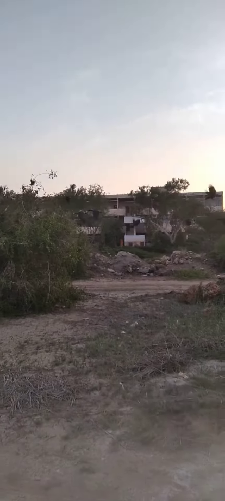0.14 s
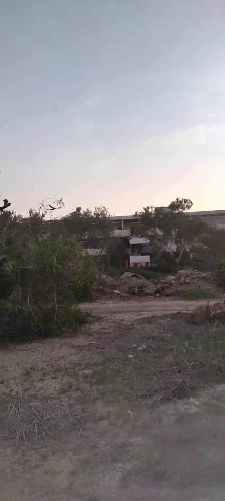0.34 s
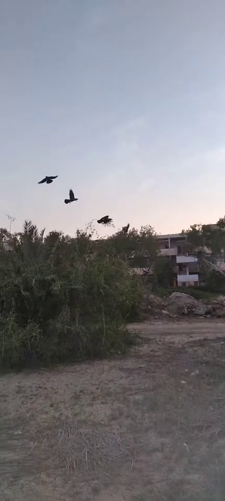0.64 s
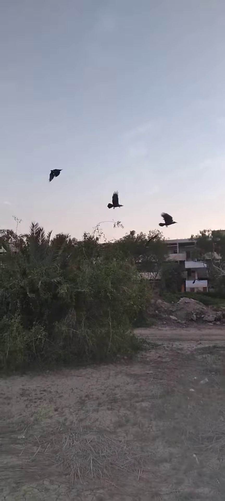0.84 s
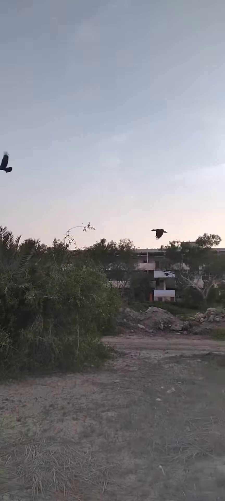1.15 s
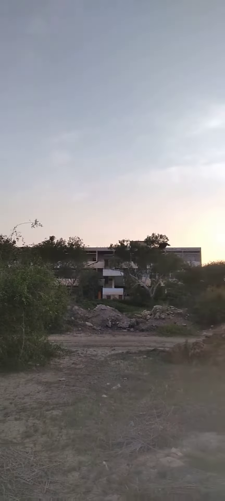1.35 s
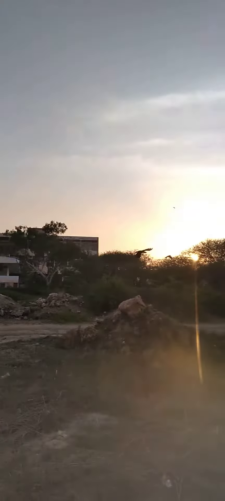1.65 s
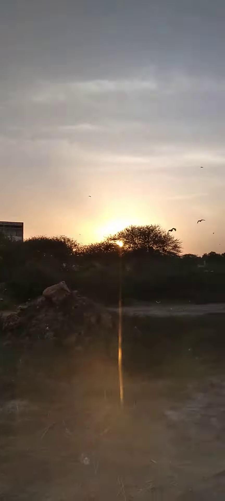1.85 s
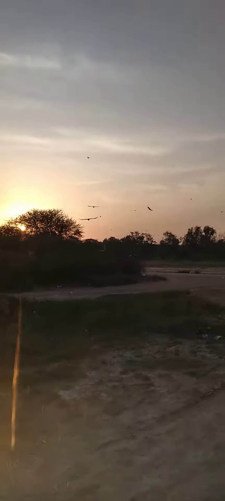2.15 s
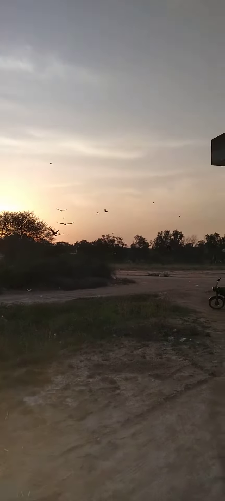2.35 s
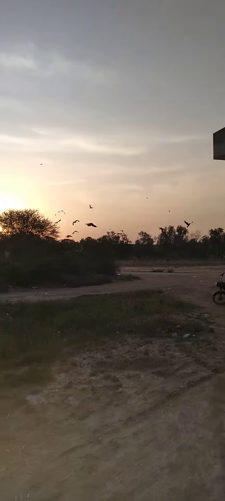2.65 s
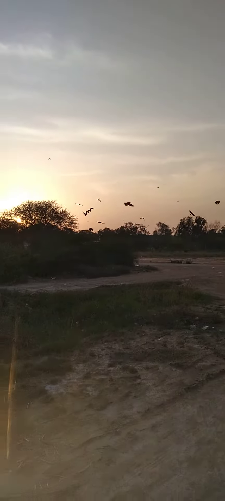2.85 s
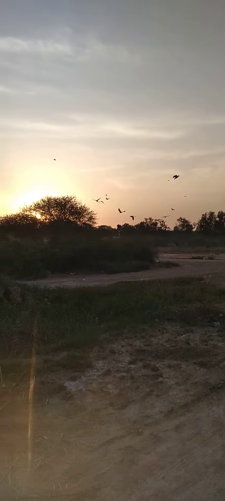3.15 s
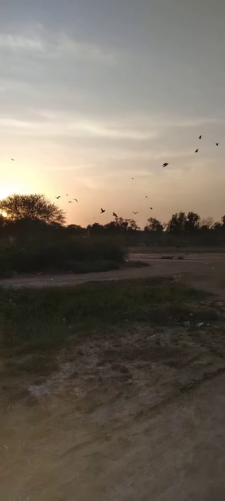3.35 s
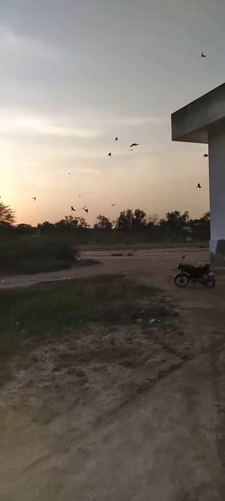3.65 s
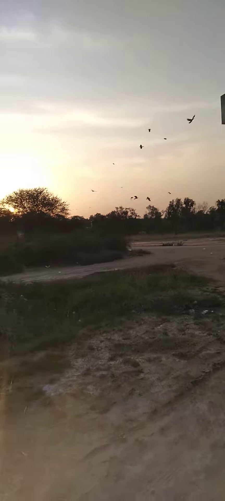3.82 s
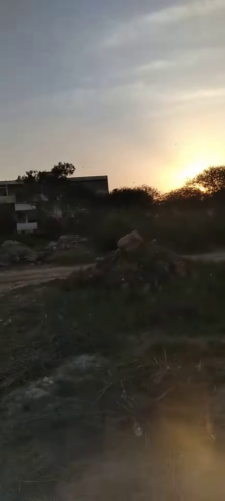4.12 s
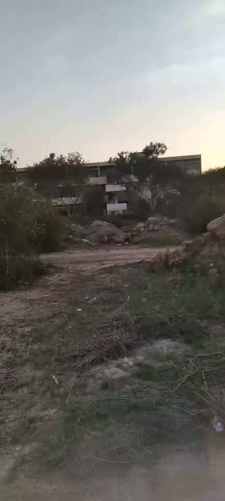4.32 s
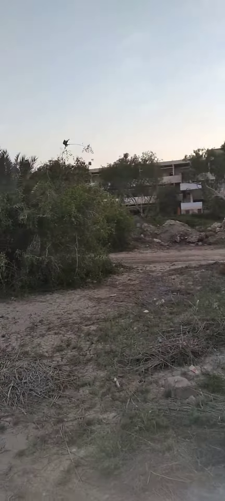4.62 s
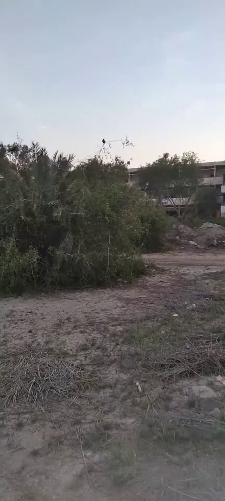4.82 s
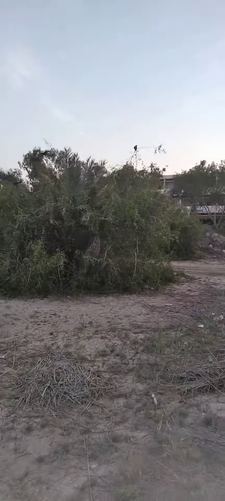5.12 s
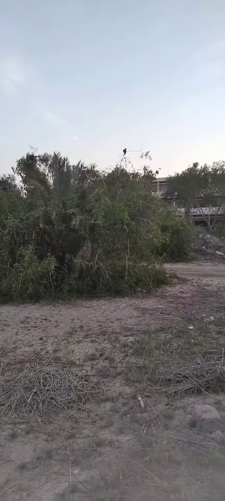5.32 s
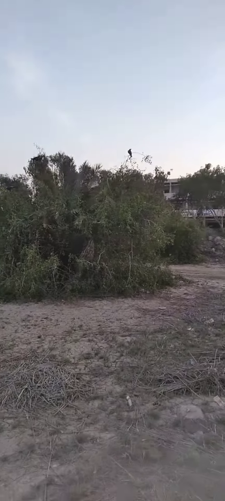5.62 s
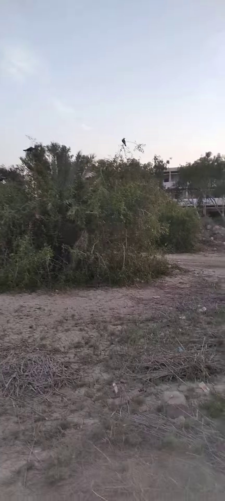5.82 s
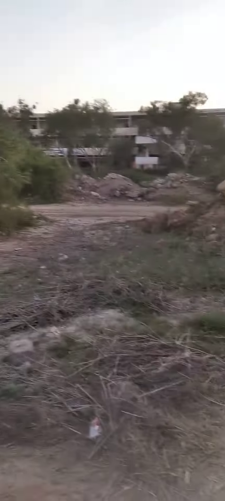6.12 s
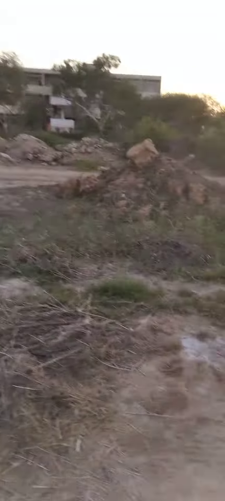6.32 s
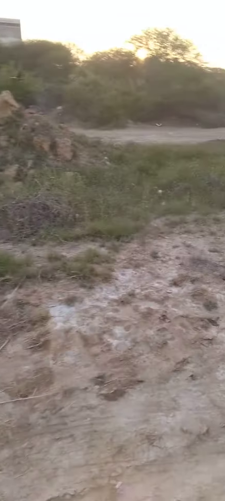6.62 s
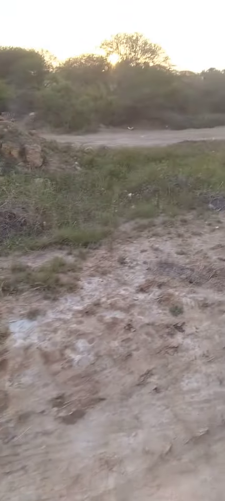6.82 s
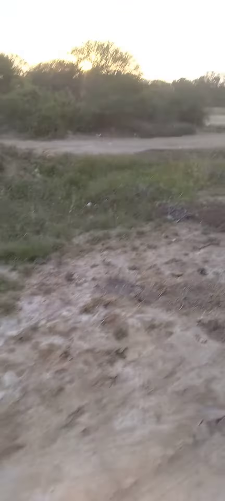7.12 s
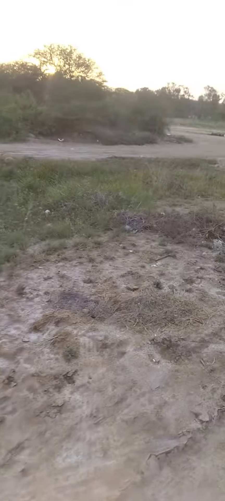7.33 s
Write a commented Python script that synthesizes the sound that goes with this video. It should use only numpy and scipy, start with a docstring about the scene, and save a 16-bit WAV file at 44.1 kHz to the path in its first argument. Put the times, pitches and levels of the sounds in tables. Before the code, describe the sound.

Outdoor crow flock: overlapping hoarse caws give way to sparse calls, with gritty foot scuffs, faint bird chips, and finger plops and clicks close by.

```python
"""Crows caw over open ground at dusk, several at once at first, then singly: warbled harmonics and
puffed turbulence pass through throat and beak. Filtered noise gives the blur of the far flock, a low
rumble and a thin hiss; small birds chip in falling sines. The person holding the microphone shuffles
on gritty soil in bursts of random grains; fingers knock and plop on the left port, as pressure
spikes and sinking, damped tones."""
import sys
import numpy as np
from scipy import signal
from scipy.fft import rfft, irfft, next_fast_len
from scipy.io import wavfile

SR = 44100
rng = np.random.default_rng(int(sys.argv[2]) if len(sys.argv) > 2 else 0)


def transcribe(u):
    """Save the signal u as a 16-bit wav file named by the first command-line argument.

    u: samples, shape (n,) or (channels, n), limited to [-1, 1]; the rate is SR.
    q: integer samples, one column per channel.
    """
    v = np.clip(np.atleast_2d(u).T, -1, 1)
    q = np.round(v * 32767).astype(np.int16)
    wavfile.write(sys.argv[1], SR, q)


N = 329409
TIME = np.arange(N) / SR
# stereo differences are split evenly between the ports, left first
LEFT_MORE = np.array([[.5], [-.5]])
RIGHT_MORE = -LEFT_MORE


def from_db(db):
    """Amplitude ratio: 20 dB is a factor of ten."""
    return 10 ** (np.asarray(db) / 20)


def rms_one(x):
    """Normalisation of mean power: scale to unit rms."""
    return x / np.sqrt(np.mean(x ** 2) + 1e-20)


def in_time(rows):
    """Linear interpolation of (time, value) rows at every sample."""
    return np.interp(TIME, *np.transpose(rows))


def at_hz(points, hz):
    """Interpolation of a spectrum along a logarithmic frequency axis."""
    knots, values = np.transpose(points)
    return np.interp(np.log(hz + 1e-3), np.log(knots), values)


def colour(x, gain_at):
    """Linear filtering as multiplication in the spectrum; gain_at maps frequency to gain."""
    size = next_fast_len(x.shape[-1] + 1024)
    hz = np.arange(size // 2 + 1) * SR / size
    return irfft(rfft(x, size) * gain_at(hz), size)[..., :x.shape[-1]]


def butter(x, hz, kind, order=2):
    """Causal Butterworth filtering: a maximally flat passband."""
    return signal.sosfilt(signal.butter(order, hz, kind, fs=SR, output="sos"), x + 1e-18)


def wander(t, per_s):
    """Slow random modulation: unit-variance random knots joined by straight lines."""
    knots = rng.standard_normal(4096)
    return np.interp(t * per_s, np.arange(len(knots)), knots)


def add(track, s, sound):
    """Superposition: mix a sound in at time s, trimming what lies outside the track."""
    at = round(s * SR)
    sound = sound[..., max(-at, 0):N - at]
    start = max(at, 0)
    track[..., start:start + sound.shape[-1]] += sound


def field(x, dull_hz=4000, t60_s=.6):
    """Diffuse scattering off ground, bushes and walls: decaying noise, independent at each port."""
    t = np.arange(int(.8 * SR)) / SR
    decay = from_db(-60 * t / t60_s)
    early = 1 + 3 * np.exp(-t / .015)
    scatter = rng.standard_normal((2, len(t))) * decay * early * (t > .002)
    scatter = scatter / np.sqrt(np.sum(scatter ** 2, axis=1, keepdims=True))
    # the right port's sound excites the tails at both ports
    wet = from_db([[-7], [-10]]) * signal.fftconvolve(x[1:], scatter, axes=1)[:, :N]
    return butter(wet, dull_hz, "low", order=1)


# Resonances of a crow's throat: (f/Hz, level/dB)
THROAT = [(300, -21), (480, -22), (860, -7), (1100, -8.5), (1350, -1), (1540, -3), (1850, 0), (2280, 0.5),
          (2750, -14.5), (3400, -12.5), (3800, -12), (4080, -4.5), (4500, -18.5), (5400, -18.5),
          (7000, -22.5), (9700, -26.5), (12500, -51)]


def throat(hz, beak_hz, rasp_db, beak_db=12.5, width_hz=170):
    """Source-filter principle: gain of throat and open beak; rasp raises the treble."""
    beak = beak_db / (1 + ((hz - beak_hz) / width_hz) ** 2)
    rasp = rasp_db / (1 + (3000 / (hz + 1)) ** 4)
    return from_db(at_hz(THROAT, hz) + beak + rasp)


# the rattle shakes the strength; turbulence grows with roughness; a call swells towards its middle
THROB_DB, TURBULENCE, ROUGH_TURBULENCE, SWELL_DB = 2.5, 0.16, 3.4, 23
# exponent by which the harmonics' resonances sink with the pitch
BEAK_FOLLOWS = 0.66


def caw(length, start_hz, top_hz, end_hz, rattle_hz, warble, beak_hz, rough, rasp_db):
    """Modulated source and filter: an arch of pitch, shaken by a slower vibration of the syrinx."""
    t = np.arange(int(length * SR)) / SR
    u = t / length
    # a call that starts near its top pitch peaks early, in pitch and in strength
    rise = np.sqrt(abs(top_hz - start_hz) + 1)
    fall = np.sqrt(abs(top_hz - end_hz) + 1)
    crest = rise / (rise + fall)
    before = np.maximum(1 - u / crest, 0) ** 2
    after = np.maximum((u - crest) / (1 - crest), 0) ** 2
    arch = top_hz + (start_hz - top_hz) * before + (end_hz - top_hz) * after

    # the rattle slows towards the end and bends both pitch and strength
    rattle_rate = rattle_hz * (1.05 - .12 * u + .15 * rough * wander(t, 90))
    rattle = 2 * np.pi * (np.cumsum(rattle_rate) / SR + rng.random())
    jitter = .03 * rough * wander(t, 350) + .004 * wander(t, 30)
    pitch = arch * (1 + warble * np.sin(rattle) + jitter)
    throb = from_db(THROB_DB * np.cos(rattle + .5) + 3.3 * rough * wander(t, 129.5))
    phase = 2 * np.pi * np.cumsum(pitch) / SR

    # the beak closes as the pitch sinks, lowering the resonances that shape the harmonics
    opening = (arch / top_hz) ** BEAK_FOLLOWS
    tone = sum(throat(k * pitch / opening, beak_hz, rasp_db) * np.cos(k * phase)
               for k in range(1, 15))
    # turbulence comes in puffs, one a cycle, with extra treble
    puffs = rng.standard_normal(len(t)) * (1 + .7 * np.cos(phase))
    turbulence = (TURBULENCE + ROUGH_TURBULENCE * rough) * puffs
    turbulence = turbulence + 2.1 * butter(puffs, 5000, "high")
    voice = throb * (tone + colour(turbulence, lambda hz: throat(hz, beak_hz, rasp_db)))

    fade_in = np.sin(np.pi / 2 * np.clip(t / 0.024, 0, 1))
    fade_out = np.sin(np.pi / 2 * np.clip((length - t) / 0.059, 0, 1))
    swell = from_db(-SWELL_DB * (u - (crest + .5) / 2) ** 2)
    return rms_one(voice) * fade_in * fade_out * swell


# Near calls: (t/s, voice, length/s, top f/Hz, level/dB before swell and stereo split,
# roughness/0-1, rasp/dB)
CAWS = [ (-.15, "flat", 0.23, 461.3, -31.5, 0.28, -5), (.019, "hoarse", .44, 477.2, -32, 0.56, -8.5),
        (0.171, "shrill", .21, 527.7, -36.5, .77, 4), (.332, "flat", 0.39, 451.3, -35, 0.68, -9),
        (.53, "shrill", 0.29, 497.8, -36.5, 0.55, -8), (.668, "hoarse", 0.4, 457, -30, 0.59, -8),
        (.718, "curt", 0.23, 470.7, -31.5, 0.8, -15), (1.026, "flat", 0.21, 455, -43, 0.53, -11),
        (1.252, "deep", 0.29, 417.4, -34.5, 0.47, -2), (1.289, "gruff", 0.35, 472.3, -30.5, 0.34, -10.5),
        (1.656, "curt", 0.19, 491.4, -39, 0.28, -5), (1.715, "deep", .3, 421, -33.5, 0.61, -7),
        (1.839, "gruff", .28, 399.3, -41.5, .4, -8), (2.511, "curt", 0.18, 493.3, -39, .3, -2),
        (2.931, "curt", 0.18, 495.5, -39, .27, 0), (3.357, "curt", .16, 494, -43, .25, -4),
        (3.761, "hoarse", 0.31, 450.4, -38.5, .15, 2.5), (4.004, "flat", 0.16, 450, -46.5, 0.37, -5),
        (4.132, "flat", 0.142, 456.5, -49.5, 0.65, -5), (4.834, "hoarse", 0.3, 456, -35.5, 0.14, -4),
        (5.748, "sagging", .33, 445.4, -40.5, 0.08, -7.5), (5.976, "sagging", 0.052, 464, -37.5, .15, -18),
        (6.478, "falling", .31, 486, -41, 0.23, 1), (6.61, "sagging", 0.28, 452, -37, .13, 3.5)]
# Voices by name: (nominal rattle rate/Hz, warble/share of pitch, beak resonance f/Hz,
# right minus left level/dB before shading, rise/share of top pitch, fall/share of top pitch)
VOICES = { "hoarse": (79, 0.067, 1783, 0.76, .1, .125), "gruff": (71, .053, 1938, 2.5, .09, .18),
          "deep": (63, 0.059, 1830, 1, .09, .11), "shrill": (57, 0.06, 2170, 2.1, 0.0355, 0.12),
          "curt": (66, 0.049, 1933, 2, 0.0452, 0.0644), "falling": (58, 0.05, 2090, 6.3, 0.0032, .12),
          "sagging": (69, .044, 1838, -.5, .055, .15), "flat": (73, 0.055, 1885, 2.4, 0.0402, .065)}
# Shading of the left port, which faces away from the birds: (f/Hz, level/dB)
LEFT_SHADE = [(900, -2.5), (2000, -3), (4000, -4), (7000, -15.5), (11000, -35)]


def crows(lag_ms=0.16):
    """Interaural-type cues: near calls, mostly to the right, reach the left port later and duller."""
    out = np.zeros((2, N))
    for s, voice, length, top_hz, level_db, rough, rasp_db in CAWS:
        rattle_hz, warble, beak_hz, right_db, rise, fall = VOICES[voice]
        start_hz, end_hz = top_hz * (1 - rise), top_hz * (1 - fall)
        call = caw(length, start_hz, top_hz, end_hz, rattle_hz, warble, beak_hz, rough, rasp_db)
        t = np.arange(len(call)) / SR
        late_s = (lag_ms + rng.uniform(-.07, .07)) / 1000
        ports = np.array([np.interp(t - late_s, t, call), call])
        add(out, s, ports * from_db(level_db + right_db * RIGHT_MORE))
    out[0] = colour(out[0], lambda hz: from_db(at_hz(LEFT_SHADE, hz)))
    return out + field(out)


# Correlation of the two ports: (f/Hz, likeness/0-1)
LIKENESS = [(40, 0.38), (150, 0.98), (500, 0.77), (1500, 0), (5000, 0)]


def air(spectrum):
    """Partial coherence: mid and side noise make the ports more alike in the bass; joint rms is 1."""
    def likeness(hz):
        """Coherence at a frequency, kept within its bounds."""
        return np.clip(at_hz(LIKENESS, hz), -1, 1)

    mid, side = rng.standard_normal((2, N))
    mid = colour(mid, lambda hz: from_db(at_hz(spectrum, hz)) * np.sqrt(1 + likeness(hz)))
    side = colour(side, lambda hz: from_db(at_hz(spectrum, hz)) * np.sqrt(1 - likeness(hz)))
    return rms_one(np.array([mid + side, mid - side]))


# Spectral shape of the rumble: (f/Hz, relative level per Hz/dB)
RUMBLE = [(12, 7), (25, 9.5), (40, 0), (60, 4), (90, 2), (140, -1), (220, -9.5), (330, -15.5), (500, -20),
          (750, -21), (1100, -27), (1600, -60)]
# Course of the rumble before gain and drift: (t/s, level/dB)
RUMBLE_DB = [(0.0, -43.5), (5.55, -44.5), (6.05, -41.5), (7.2, -43), (7.47, -44)]


def rumble(gain_db=4.0, left_db=0.5):
    """Band-shaped noise: a low rumble whose level drifts at random, slightly stronger on the left."""
    drift_db = 1.2 * wander(TIME, 16)
    return air(RUMBLE) * from_db(in_time(RUMBLE_DB) + gain_db + drift_db + left_db * LEFT_MORE)


# Spectral shape of the distant flock: (f/Hz, relative level per Hz/dB)
FAR_FLOCK = [(400, -9.5), (900, -4), (1150, -4.5), (1400, -0.5), (1800, 2), (2400, -7.5), (3200, -11.5),
             (4000, -17.5), (5000, -22.5), (7000, -31.5), (9800, -34.5), (12000, -60), (15000, -50)]
# The flock calms after the opening chorus, then partly returns: (t/s, level/dB before dips and flutter)
FAR_DB = [(0, -47.5), (2.1, -52), (4, -56), (7.47, -52)]
# Moments when the distant background is heard more faintly, whatever the birds do:
# (t/s, half width/s, depth/dB)
BACKGROUND_DIPS = [(4.6, 0.034, 9.5), (5.64, 0.06, 5.5), (6.19, 0.046, 8), (6.415, 0.051, 13.5),
                   (7.38, 0.085, 9)]


def far_flock(right_db=3.5):
    """Statistical superposition: many far calls blur into fluttering noise, stronger on the right."""
    flutter_db = .8 * wander(TIME, 22)
    dips_db = sum(depth_db * np.exp(-((TIME - s) / width) ** 2)
                  for s, width, depth_db in BACKGROUND_DIPS)
    return air(FAR_FLOCK) * from_db(in_time(FAR_DB) - dips_db + flutter_db + right_db * RIGHT_MORE)


# Spectral shape of the hiss: (f/Hz, relative level per Hz/dB)
HISS = [(3000, -1), (6000, -1.5), (9700, -1), (12000, -16.5), (15000, -34)]
# Swells of the hiss: (t/s, length/s, peak level on the right/dB)
HISS_SWELLS = [(-.1, 0.58, -55.5), (0.444, 0.72, -59.5), (1.332, 0.31, -53.5), (4.792, 0.36, -58.5),
               (5.634, 0.495, -60), (6.53, .35, -58.5)]


def hiss(left_db=-15):
    """Amplitude-modulated noise: a thin, high hiss swells, mainly on the right."""
    swells = np.zeros(N)
    for s, length, level_db in HISS_SWELLS:
        arch = abs(np.sin(np.pi * np.clip((TIME - s) / length, 0, 1)))
        swells += from_db(level_db) * np.sqrt(arch)
    return air(HISS) * swells * from_db([[left_db], [0]])


# Shoes on grit: (t/s, length/s, level/dB, low crunch/dB)
SCUFFS = [(0.365, 0.07, -43.5, 10), (.955, .08, -37, 0), (2.087, .063, -52.5, 3), (2.291, 0.053, -56.5, 9),
          (2.772, .026, -57, 10), (3.252, .053, -57, -1), (3.927, .051, -37.5, 6.5),
          (3.979, .088, -46.5, 4), (4.658, .013, -43, 18), (4.681, .1, -48.5, 12.5),
          (4.731, 0.0067, -38, 20.5), (5.146, 0.016, -44, 32), (5.402, .018, -50, 18),
          (6.121, 0.027, -52, 14)]
# Spectral shape of the grit: (f/Hz, level/dB)
GRIT = [(150, -12), (400, 5), (720, 6), (1100, -5.5), (1800, 11.5), (2750, 11), (3500, -6), (4700, -0.5),
        (6500, -17), (10000, -21.5), (13000, -45.5)]


def shoes(grains_per_s=900, grain_db=6.0):
    """Random impulse process: uneven grains crack under a turning sole, amid sliding noise."""
    out = np.zeros((2, N))
    for s, length, level_db, low_db in SCUFFS:
        size = int((length + .01) * SR)
        t = np.arange(size) / SR
        # one stream is shared by the ports, the other two are their own
        struck = rng.random((3, size)) < grains_per_s / SR
        strength = from_db(grain_db * np.minimum(rng.exponential(1, (3, size)), 3))
        grains = struck * strength * rng.choice([-1, 1], (3, size))
        sliding = 0.79 * rng.standard_normal((3, size))
        fades = np.clip(t / 0.0081, 0, 1) * np.clip((t[-1] - t) / 0.019, 0, 1)
        grit = (rms_one(grains) + sliding) * fades
        crunch = colour(grit[0] + .5 * grit[1:],
                        lambda hz: from_db(at_hz(GRIT, hz) + low_db / (1 + (hz / 1000) ** 4)))
        add(out, s, from_db(level_db) * rms_one(crunch))
    return out


def at_left_port(x, right_db=-53.0):
    """Near-field proximity: contact sound fills the left port and barely reaches the right."""
    return x * from_db([[0], [right_db]])


# milliseconds within one finger sound
MS = np.arange(int(.06 * SR)) / SR * 1000
# a plop falls towards a share of its first pitch and dies within a few cycles
PLOP_END_SHARE, PLOP_CYCLES = .27, 3.07
# Plops as skin seals and frees the port: (t/s, nominal peak/dB before envelope, start f/Hz)
PLOPS = [(1.149, -31, 340), (3.075, -16.5, 452), (3.3749, -15.5, 506), (4.992, -14.5, 734),
         (5.093, -23, 440), (5.112, -20.5, 175), (6.129, -21, 280), (6.1778, -20, 264),
         (6.2077, -21.5, 326)]


def finger_plops():
    """Damped cavity resonance: a sinking tone decays as skin seals and frees the left port."""
    plops = np.zeros(N)
    for s, peak_db, start_hz in PLOPS:
        pitch = start_hz * (PLOP_END_SHARE + (1 - PLOP_END_SHARE) * np.exp(-MS / 3.67))
        decay_ms = 1000 * PLOP_CYCLES / start_hz
        envelope = (1 - np.exp(-MS / 1.0)) * np.exp(-MS / decay_ms)
        tone = np.sin(2 * np.pi * np.cumsum(pitch) / SR)
        add(plops, s, -1.5 * from_db(peak_db) * tone * envelope)
    return at_left_port(plops)


# The nearest small birds: (t/s, start f/Hz, level/dB)
CHIPS = [(3.62, 3730, -61), (3.68, 3600, -60), (3.736, 3370, -57), (4.222, 2560, -53), (4.764, 4070, -55),
         (5.372, 3650, -64)]


def small_birds(length=0.0327, fall=0.135, farther_count=40):
    """Frequency glide: faint falling chips from the bushes, a few clear ones and a farther scatter."""
    out = np.zeros((2, N))
    u = np.linspace(0, 1, int(length * SR))
    # time in s, pitch in Hz and level in dB, each between its two bounds
    farther = rng.uniform([2.2, 2900, -70], [5.6, 4100, -60], (farther_count, 3))
    for s, pitch_hz, level_db in [*CHIPS, *farther]:
        phase = 2 * np.pi * np.cumsum(pitch_hz * (1 - fall * u)) / SR
        ports = np.sin([phase - np.pi / 2, phase])  # left lags by a quarter cycle
        add(out, s, from_db(level_db) * np.sin(np.pi * u) * ports)
    return out + field(out)


# a sliding finger sticks and slips at a nearly steady pace, weaker each time
SLIP_S, SLIP_LOSS_DB = .012, 11.5
# Fingers touch the left port: (t/s, peak/dB before the leak, width/ms, sliding time/s)
TOUCHES = [(4.9931, -9, .25, .005), (6.0917, -19, 0.085, .005), (6.1218, -18.5, .096, .018),
           (6.1771, -28.5, 0.2, .005), (6.2092, -24, 0.21, .005), (6.4876, -4.5, 0.19, .018),
           (6.9928, -16, .49, .005), (7.053, -2, 5.6, .005), (7.1115, -12, 0.58, .005),
           (7.126, -5, 0.15, .018), (7.1295, 8.5, 0.24, .042), (7.1373, -8, 0.13, .018),
           (7.193, -5, 5.4, .005), (7.2814, -21.5, 0.79, .005)]


def finger_touches(leak_hz=55):
    """Stick-slip and pressure leakage: contact spikes at the left port, high-passed by the leak."""
    spikes = np.zeros(N)
    for s, peak_db, width_ms, slide_s in TOUCHES:
        x = (MS - 20) / width_ms  # the spike peaks 20 ms into its window
        spike = np.exp(.3 - np.hypot(x, .3))
        for k in range(1 + int(slide_s / SLIP_S)):
            slip_s = s + k * SLIP_S * rng.uniform(.92, 1.08)
            add(spikes, slip_s - .02, -from_db(peak_db - k * SLIP_LOSS_DB) * spike)
    return at_left_port(butter(spikes, leak_hz, "high"))


def scene():
    """Linear superposition of all sources at the two ports."""
    near = crows() + shoes() + finger_plops() + small_birds() + finger_touches()
    return near + rumble() + far_flock() + hiss()


def record(dry, stop_hz=16500):
    """Saturation and band limiting: full scale clips, then the top is cut 70 dB from stop_hz up."""
    low_pass = signal.cheby2(12, 70, stop_hz, fs=SR, output="sos")
    return signal.sosfilt(low_pass, np.clip(dry, -1, 1))


dry = scene()
out = record(dry)
transcribe(out)
```